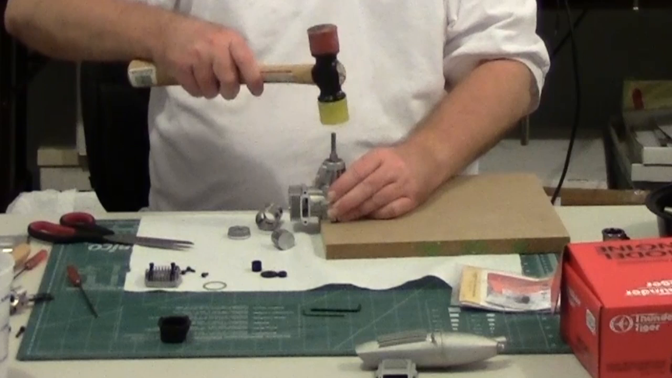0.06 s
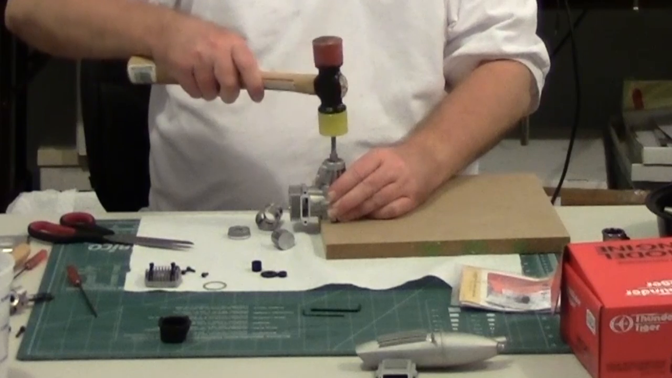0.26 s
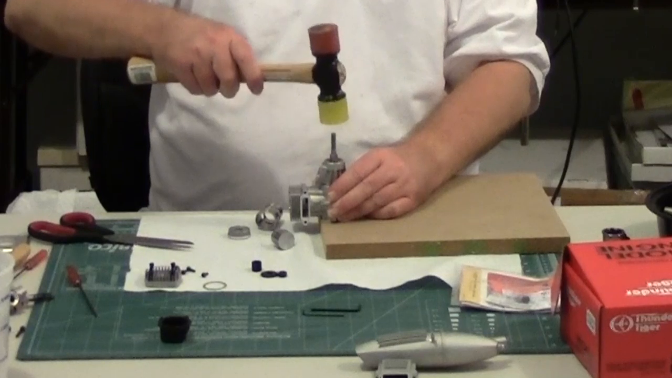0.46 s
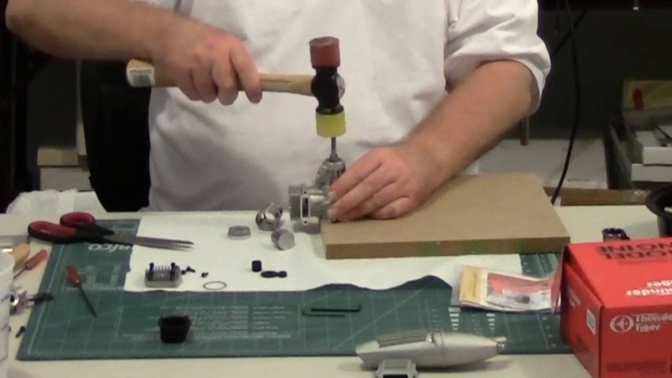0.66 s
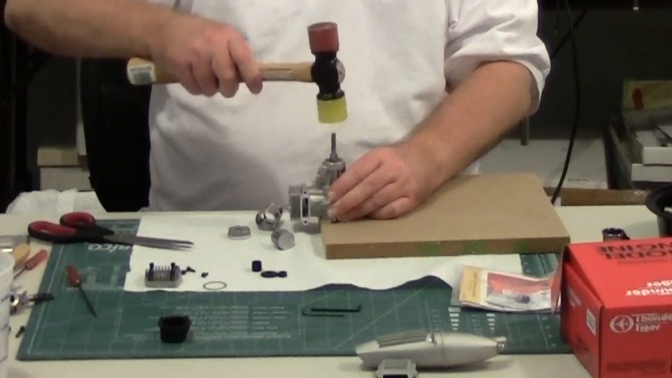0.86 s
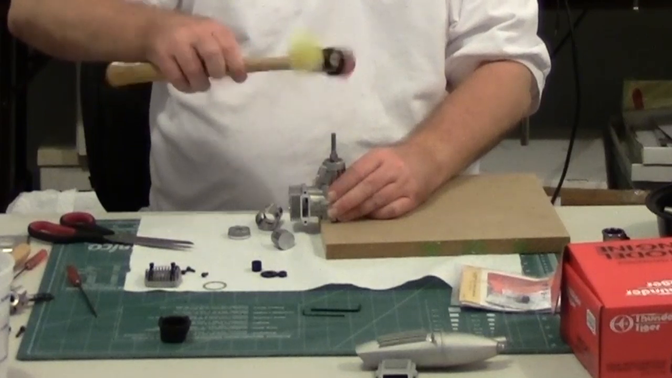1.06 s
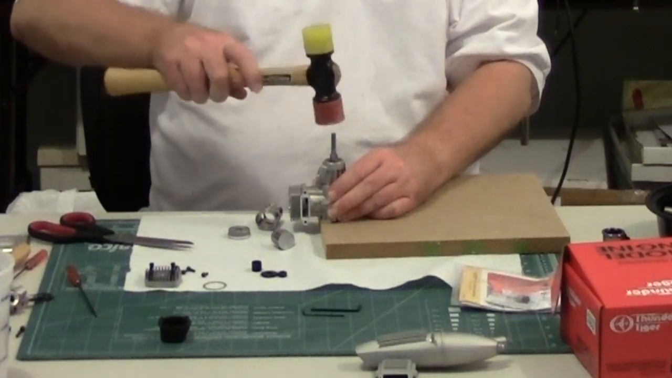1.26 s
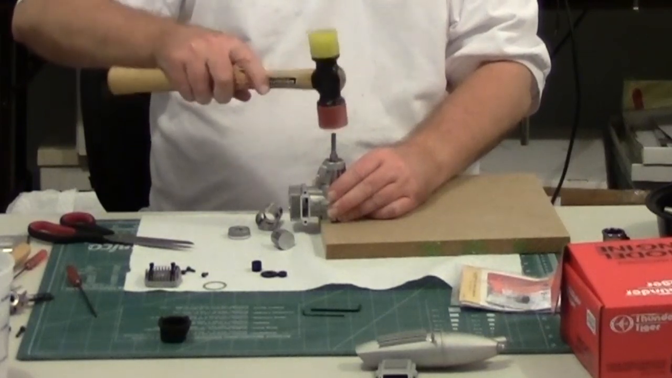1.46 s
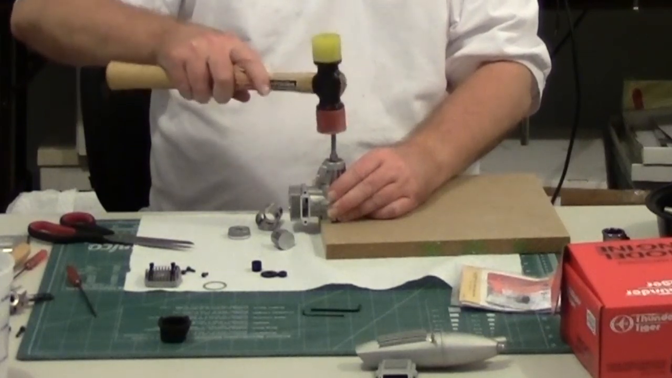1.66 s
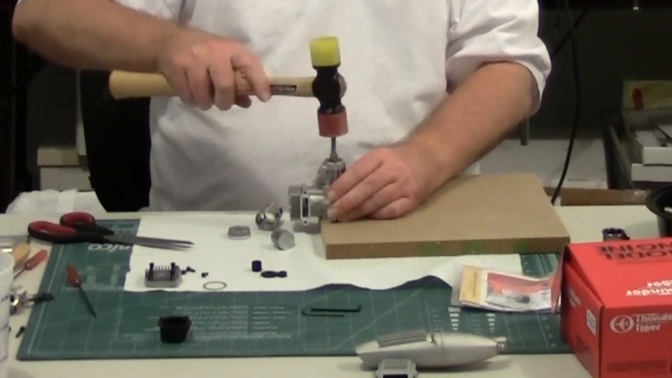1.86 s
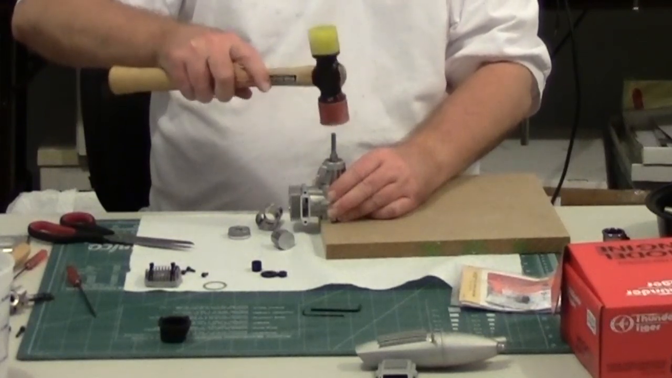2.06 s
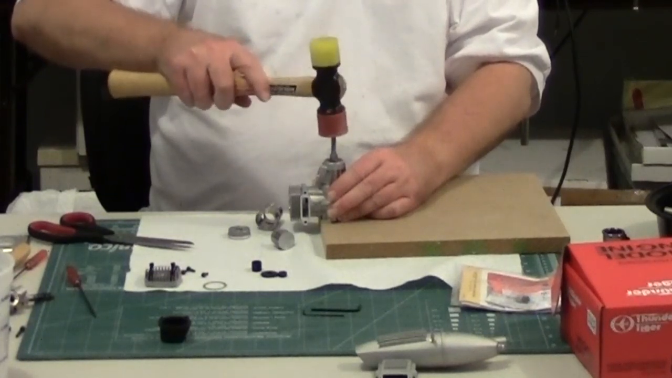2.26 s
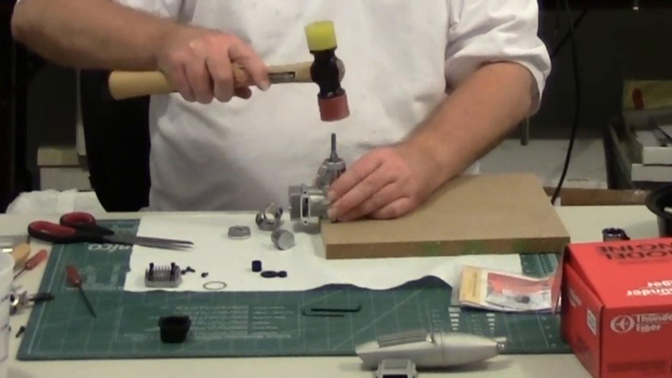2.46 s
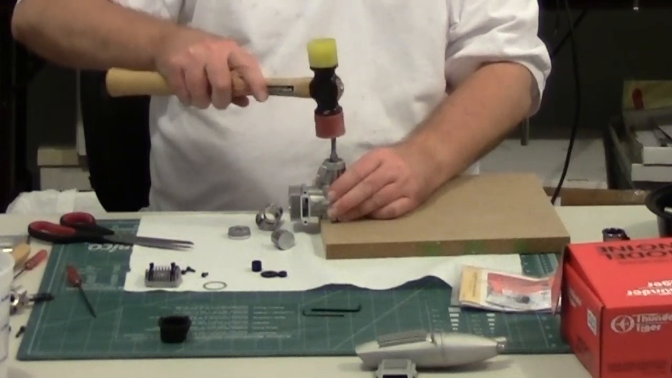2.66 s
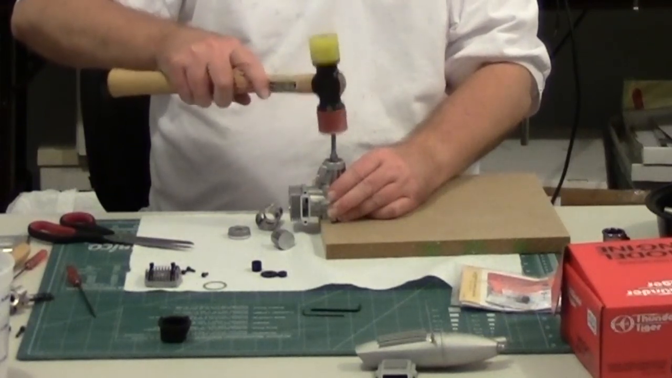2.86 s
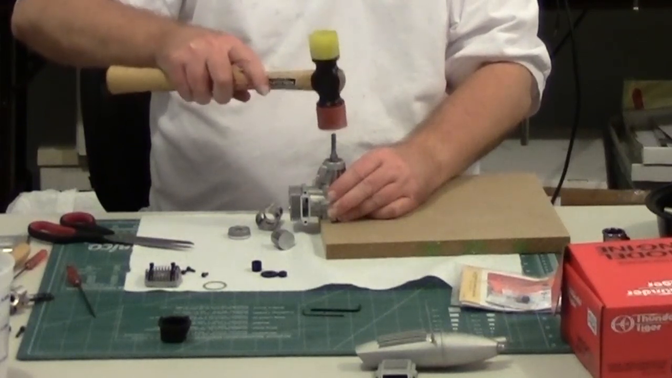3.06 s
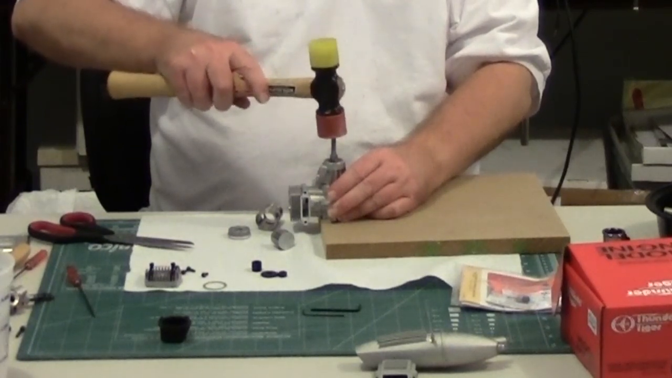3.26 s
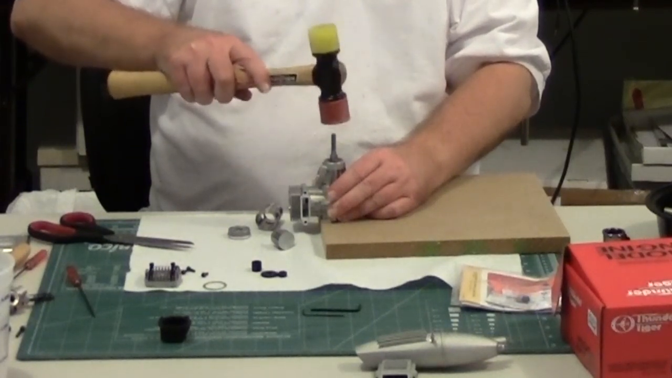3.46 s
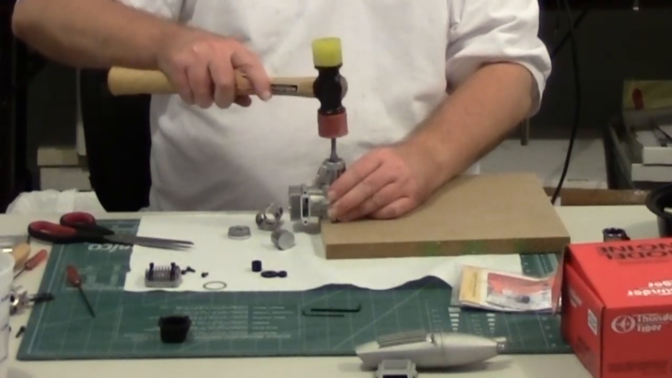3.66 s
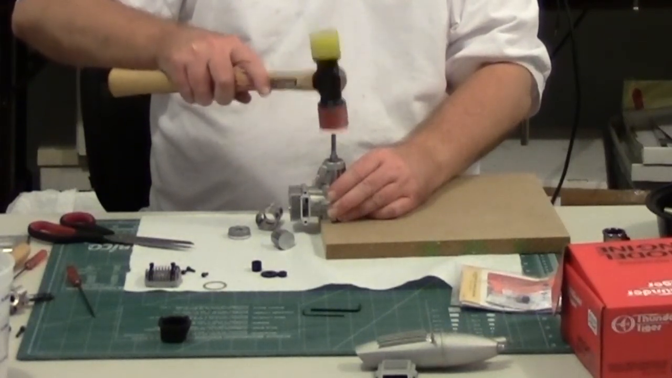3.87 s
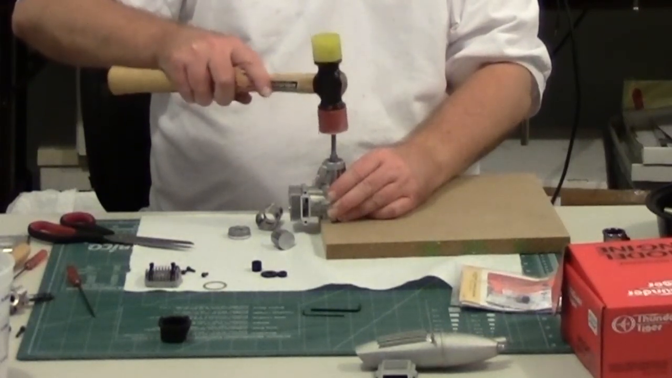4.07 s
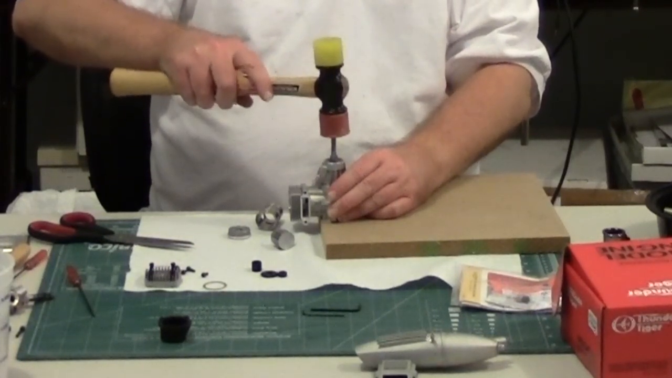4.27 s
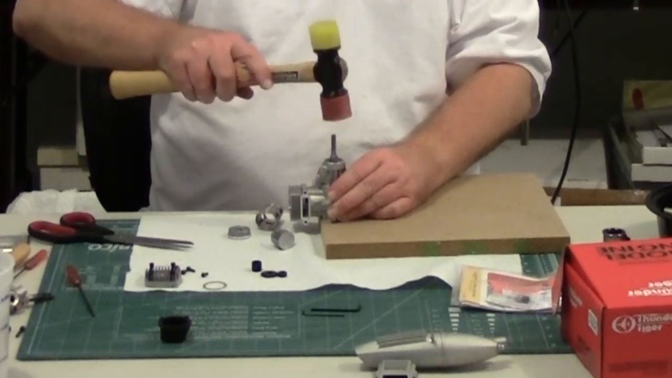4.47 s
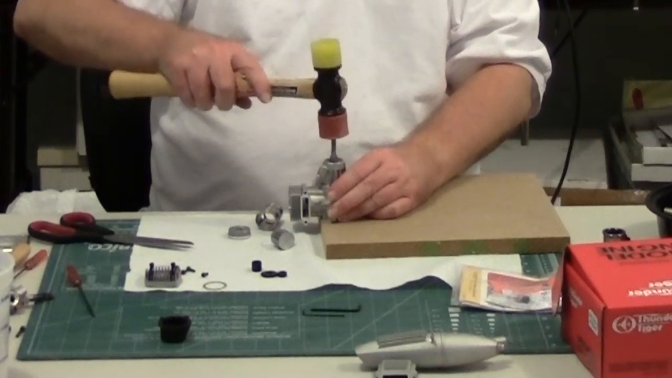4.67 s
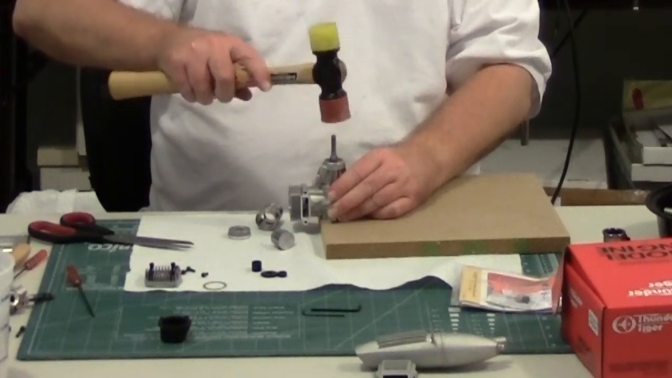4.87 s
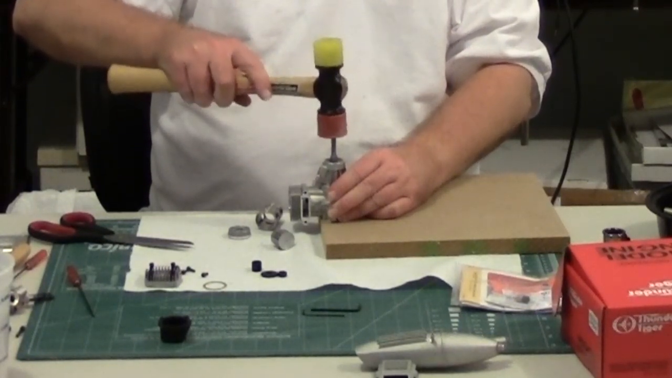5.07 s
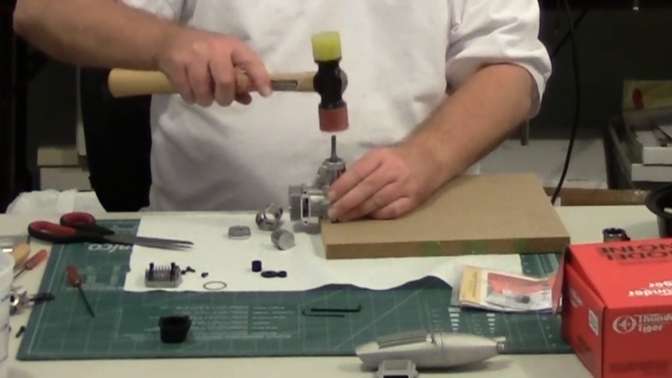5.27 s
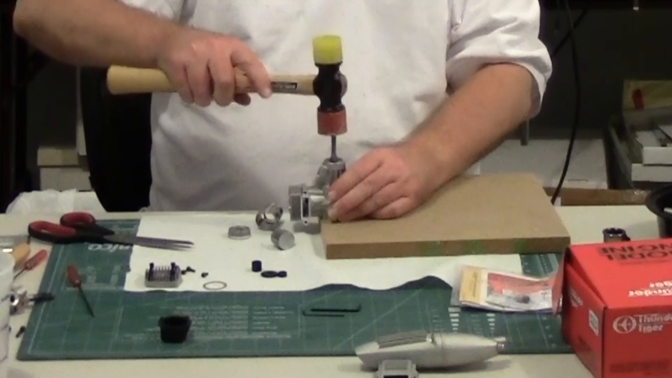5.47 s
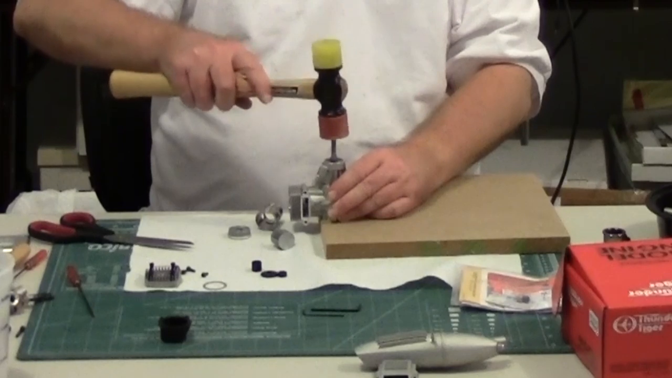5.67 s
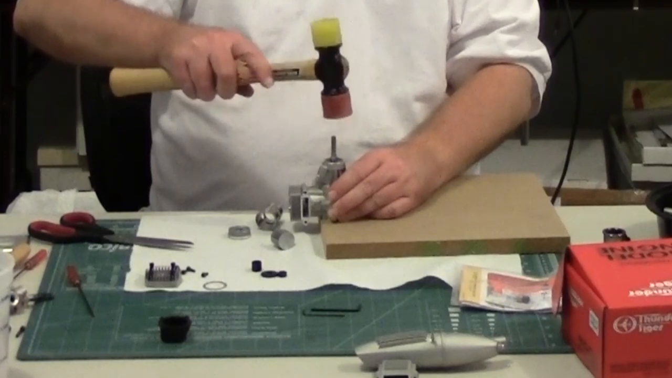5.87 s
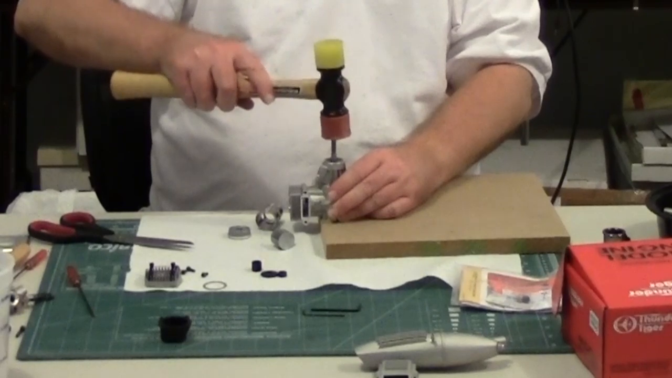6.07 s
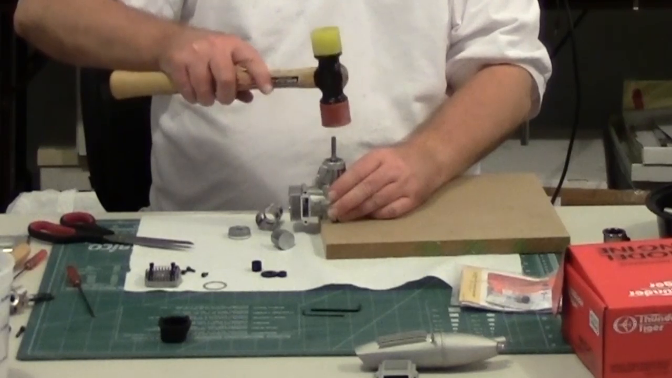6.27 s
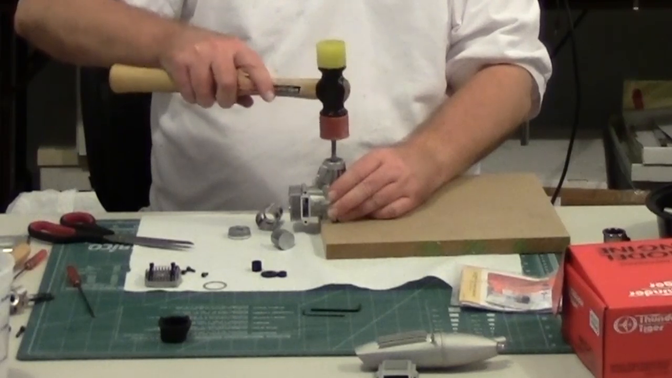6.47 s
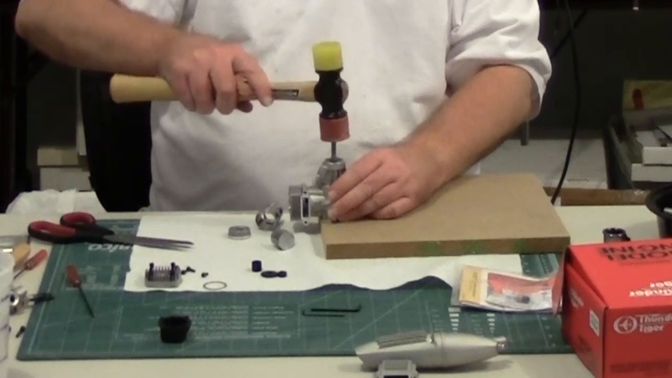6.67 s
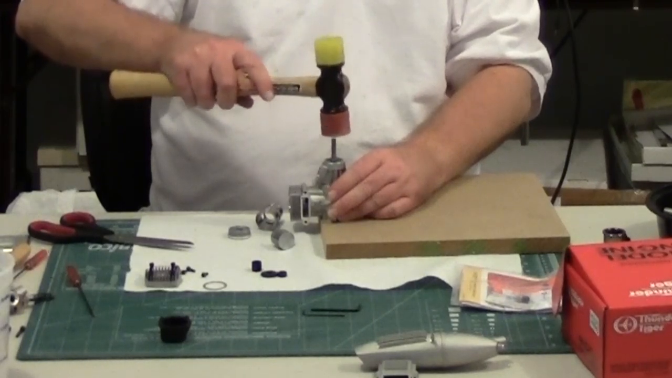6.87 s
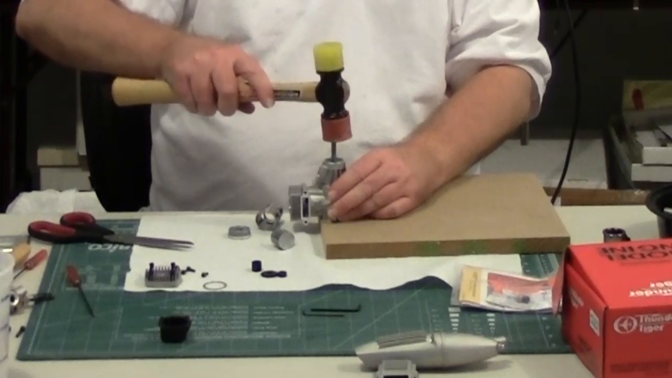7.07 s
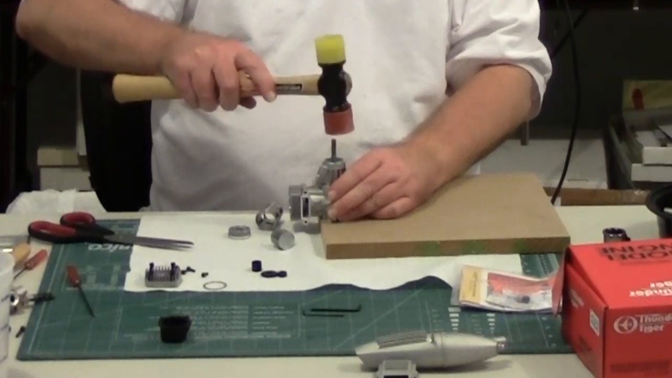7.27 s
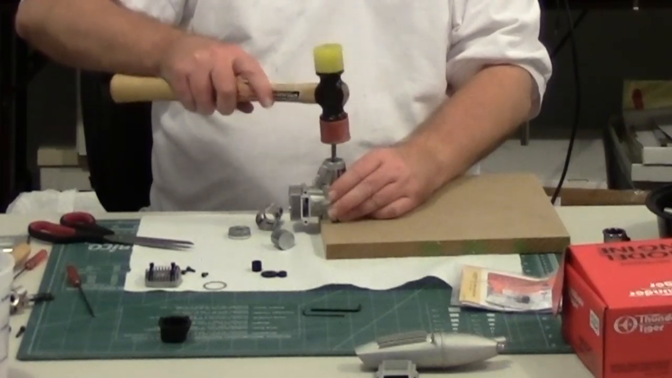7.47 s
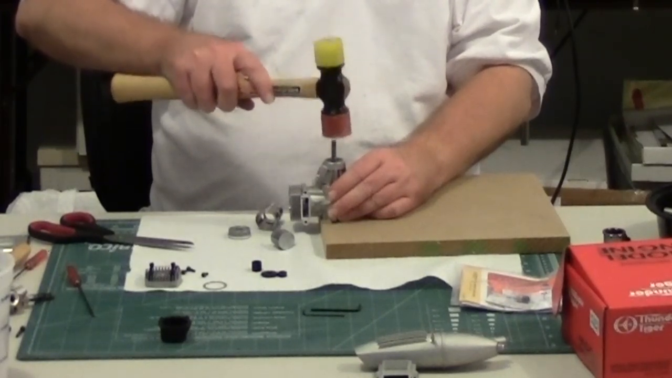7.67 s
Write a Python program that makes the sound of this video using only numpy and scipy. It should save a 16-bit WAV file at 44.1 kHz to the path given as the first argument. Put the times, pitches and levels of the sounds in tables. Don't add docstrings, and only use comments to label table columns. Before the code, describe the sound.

In a workshop, a plastic-faced mallet taps a steel shaft in a small metal housing resting on a board on a bench. The tail of a blow opens the sound, then harder, brighter knocks fall at 0.3 and 0.65 seconds. Their short room echo dies into near-silence, with barely audible low swells around 1.4 to 1.5. From 1.64 a softer, duller face strikes steadily, roughly every 0.35 seconds. Each tap is a compact woody thud with low bench resonance, a slight metallic knock and a tight rattle about ten milliseconds later as the housing lands. Small loose parts clink faintly, with a clearer high ring near 2.7 and another near 6.8. From about 6.5 the taps weaken, the last at 7.5 very soft. Faint workshop hush surrounds each blow, then is gated away.

```python
import sys
import numpy as np
from scipy import signal
from scipy.fft import rfft, irfft
from scipy.io import wavfile
from scipy.ndimage import uniform_filter1d

SR = 44100
rng = np.random.default_rng(int(sys.argv[2]) if len(sys.argv) > 2 else 0)


def dump(signal):
    limited = np.clip(np.atleast_2d(signal).T, -1, 1)
    pcm = np.round(limited * 32767).astype(np.int16)
    wavfile.write(sys.argv[1], SR, pcm)


def level_to_linear(level):
    exponent = np.asarray(level, float) / 20
    return 10 ** exponent


N = 339966
LENGTH = 32000

# f/Hz, level/dB, t60/s
PARTS = [(4400, -3, .18), (5420, -8, .2), (6100, -1, .15), (6670, -1, .1), (7560, -14, .08),
         (8800, -1, .14), (10320, -17, .22), (10700, -6, .11), (13100, -24, .12), (14300, -24, .1)]
# f/Hz, density/(dB per Hz)
RATTLE_COLOUR = [(1760, -10.5), (3000, -6.5), (3500, -3.5), (5030, -11.5), (8870, -16), (9520, -19.5),
                 (12900, -23), (16000, -51.5)]
# t/s, level/dB
HUSH_FADE = [(5.8, -2.5), (6.5, -4), (7.101, -9), (7.45, -10.5), (7.7, -12.5)]


def evened(x):
    return x / np.sqrt(np.mean(x ** 2) + 1e-20)


def read(points, hz, axis=1):
    table = np.transpose(points)
    return np.interp(np.log(hz + 1), np.log(table[0] + 1), table[axis])


def add(mix, s, sound):
    at = round(s * SR)
    sound = sound[..., max(-at, 0):]
    part = mix[..., max(at, 0):][..., :sound.shape[-1]]
    part += sound[..., :part.shape[-1]]


def onset(rise_s):
    return 1 - np.exp(-(np.arange(LENGTH) / SR / rise_s) ** 2)


def modes(rows, detune):
    t = np.arange(LENGTH) / SR
    out = 0
    for (hz, db, t60_s), ratio in zip(rows, detune):
        out = out + level_to_linear(db - 60 * t / t60_s) * np.sin(2 * np.pi * hz * ratio * t)
    return out


def scattered(rows, scatter_db, chance):
    return [(hz, db + scatter_db * c, t60_s) for (hz, db, t60_s), c in zip(rows, chance)]


def field(white, colour, rise_s, hold_s, ring=1, lumps_db=0, wide_db=-3):
    # f/Hz, t60/s
    near_t60 = [(60, 0.37), (200, 0.29), (600, 0.4), (2000, 0.31), (5000, 0.26), (12000, 0.17)]
    # f/Hz, t60/s, level under near field/dB
    far_end = [(60, 0.82, -18), (200, 0.37, -28.5), (597, 0.5, -19), (2000, 0.58, -16.5), (5000, 1, -20),
               (12000, 1, -18.5)]
    # f/Hz, side minus mid/dB
    side_db = [(60, -9), (150, -20), (380, -25), (950, -23), (1900, -30.5), (2800, -36.5), (8000, -39),
               (12000, -17.5)]
    fill_cycles = 1.5
    hz, t, z = signal.stft(white, SR, nperseg=512, noverlap=384)
    build = 1 - np.exp(-(t + 0.0015) * hz[:, None] / fill_cycles)
    t = np.maximum(t - hold_s, 0) / ring
    near = level_to_linear(-60 * t / read(near_t60, hz)[:, None])
    far = level_to_linear(read(far_end, hz, axis=2)[:, None] - 60 * t / read(far_end, hz)[:, None])
    tone = level_to_linear(read(colour, hz))
    tone = tone / np.sqrt(np.mean(tone ** 2)) * level_to_linear(lumps_db)
    z *= tone[:, None] * np.hypot(near, far) * build
    z[1] *= level_to_linear(read(side_db, hz) + wide_db)[:, None]
    echoes = signal.istft(z, SR, nperseg=512, noverlap=384)[1]
    return echoes[:, :LENGTH] * onset(rise_s)


def hush():
    # f/Hz, density/(dB per Hz)
    colour_db = [(15, -47), (25, -5), (157, -4), (317, -8.5), (886, -12.5), (1130, -19), (1370, -19),
                 (1790, -20), (6910, -39), (11200, -44), (16000, -60.5)]
    # f/Hz, side minus mid/dB
    side_db = [(100, -9), (1500, -13.5), (5000, -19), (12000, -4)]
    hz = np.fft.rfftfreq(N, 1 / SR)
    colour = level_to_linear(read(colour_db, hz) + np.array([0 * hz, read(side_db, hz)]))
    level_db = -42.5 + np.interp(np.arange(N) / SR, *np.transpose(HUSH_FADE))
    noise = irfft(rfft(rng.standard_normal((2, N))) * colour, N)
    return level_to_linear(level_db) * evened(noise) * np.sqrt(2)


def knock(hard, chance):
    # f/Hz, level/dB, t60/s
    shaft = [(648, 5.5, 0.0067), (1189, -2.5, 0.08), (1453, -40, 0.019), (1950, -3, 0.0084),
             (2390, -16, 0.033), (2540, -1.5, .04), (3410, -6, 0.018), (4330, -13, 0.03), (4610, -22, 0.01)]
    # f/Hz, level/dB, t60/s
    housing = [(1220, -29.5, 0.63), (1453, -46.5, 0.52), (2750, -39.5, 0.76), (3590, -37.5, 0.66)]
    shaft_rows = scattered(shaft, 2.5, chance[2:])
    strike = level_to_linear(-7.5 + 6 * hard) * modes(shaft_rows, 1 + .015 * chance[::-1])
    return (strike + modes(housing, 1 + 0.0037 * chance)) * onset(.0004)


def thud(soft_db, bench_db, shop, fresh, chance):
    # f/Hz, density/(dB per Hz)
    colour = [(15, -59), (25, -57.5), (149, -2), (326, -4.5), (439, -2), (545, -8), (607, -7), (839, -6.5),
              (961, -5.5), (1070, -6), (1740, -8.5), (4130, -20.5), (13600, -55.5), (16000, -48)]
    # f/Hz, level/dB, t60/s
    board = [(253, -9.5, 0.5), (365, -6, .18), (438.8, 4, 0.22), (494, -8, 0.43), (681.4, -3.5, 0.32),
             (883, -9.5, 0.23)]
    # f/Hz, level/dB, t60/s
    legs = [(79.6, -21.5, 0.28), (135.9, -13.5, 0.27), (244, -14, 0.25)]
    board_db = -5.5 - 1.5 * chance[-1] + 0.22 * soft_db
    t = np.arange(LENGTH) / SR
    alike = np.clip(1.32 * np.exp(-t / 0.021), 0, 1)
    white = alike * shop + np.sqrt(1 - alike ** 2) * fresh[0]
    lumps_db = 1.5 * evened(uniform_filter1d(fresh[1, 1, -257:], size=3))
    out = field(white, colour, .0004, 0.025, lumps_db=lumps_db) * level_to_linear(-9)
    board_rows = scattered(board, 2.5, chance[4:])
    out[0] += level_to_linear(board_db - 7.5) * modes(board_rows, 1 + .015 * chance) * onset(0.0025)
    legs_db = 0.44 * (bench_db + 20.5)
    out[0] += level_to_linear(legs_db) * modes(legs, 1 + 0.026 * chance) * onset(0.035)
    return out


def rattle(soft_db, hard, fresh, chance):
    level_db = -20.5 - 7.8 * soft_db - 2 * hard
    lumps_db = 2.5 * evened(uniform_filter1d(fresh[1, 0, -257:], size=7))
    out = field(fresh[1], RATTLE_COLOUR, 0.0037, 0.016, ring=1.22, lumps_db=lumps_db, wide_db=-9) * level_to_linear(level_db)
    damped = [(hz, db, t60_s / 2) for hz, db, t60_s in scattered(PARTS, 5, chance[::-1])]
    out[0] += level_to_linear(level_db - 12) * modes(damped, 1 + .02 * chance) * onset(.001)
    return out


def bench_hum(bench_db):
    # f/Hz, level/dB, t60/s, build-up/s
    bench = (167, 4, 0.48, 0.013)
    hz, hum_db, t60_s, build_s = bench
    t = np.arange(LENGTH) / SR
    return level_to_linear(bench_db + hum_db - 60 * t / t60_s) * onset(build_s) * np.sin(2 * np.pi * hz * t)


def blow(row, shop, fresh, chance):
    # f/Hz, level/dB
    echo_colour = [(300, -21.5), (800, 0), (1200, -1), (2500, -2.5), (4300, -21), (6000, -26.5),
                   (16000, -57)]
    # delay/s, level/dB
    wall = (.024, -8)
    s, db, bench_db, jump_ms = row
    hard = s < 1.1
    soft_db = max(-10 - db, 0)
    landing_db = -8.5 + 1.85 * (jump_ms - 13.2)
    body = thud(soft_db, bench_db, shop, fresh, chance)
    metal = rattle(soft_db, hard, fresh, chance)
    out = body + level_to_linear(-20) * metal
    out[0] += knock(hard, chance)
    add(out, jump_ms / 1000, level_to_linear(landing_db) * body + metal)
    add(out, wall[0], level_to_linear(wall[1] - 10) * field(fresh[1, :, ::-1], echo_colour, 0.0025, 0.013))
    out[0] += bench_hum(bench_db)
    return level_to_linear(db) * out


def clink(row, fresh, chance):
    s, db, centre_hz, spread = row
    rows = [(hz, level - 6 * (np.log2(hz / centre_hz) / spread) ** 2, t60_s) for hz, level, t60_s in PARTS]
    out = level_to_linear(1) * spread * field(fresh, RATTLE_COLOUR, 0.0039, 0.0036)
    waver = 1 + 1.5 * evened(uniform_filter1d(fresh[0], 150))
    out[0] += level_to_linear(-8) * modes(rows, 1 + 0.0028 * chance) * onset(0.002) * waver
    return level_to_linear(db) * out


def rumble():
    # t/s, f/Hz, half length/s, level/dB
    swells = [
        (1.399, 205, 0.023, -75),
        (1.47, 135.2, .03, -64),
        (1.503, 145, .04, -72),
    ]
    t = np.arange(N) / SR
    out = np.zeros(N)
    for s, hz, half_s, db in swells:
        out += level_to_linear(db) * np.exp(-((t - s) / half_s) ** 2) * np.sin(2 * np.pi * hz * t)
    return out


def scene():
    blows = [(-.05, -6.5, -19, 9.9), (0.2804, -5, -20.5, 8), (0.656, -6.5, -18, 7), (1.639, -8.5, -16, 14),
             (1.986, -6, -16.5, 14.5), (2.342, -6.5, -15, 11), (2.685, -5.5, -15, 8.8),
             (3.021, -6.5, -14.5, 9.5), (3.349, -6, -13, 10), (3.683, -7, -15, 9.5),
             (4.031, -5.5, -14.5, 9), (4.37, -6, -16.5, 9.2), (4.722, -6, -13, 7.5), (5.078, -6, -12, 7.4),
             (5.437, -8, -16.5, 8.5), (5.763, -7, -15.5, 11), (6.123, -7, -20, 8.5),
             (6.466, -10.5, -43, 8.5), (6.805, -13.5, -34, 8), (7.156, -19.5, -50, 6.6),
             (7.478, -28, -32, 4.6)]
    # t/s, level/dB, ring centre f/Hz, spread/octaves
    clinks = [
        (0.839, -45.5, 7630, 0.92),
        (2.075, -51, 14300, .1),
        (2.17, -39, 7700, 0.49),
        (2.691, -24, 8950, 0.057),
        (2.865, -46, 7300, 0.79),
        (3.185, -48, 8060, 0.62),
        (3.851, -45.5, 6500, 0.59),
        (5.92, -42.5, 8000, 0.77),
        (6.819, -32, 10200, 0.027),
        (7.482, -43, 5420, .04),
    ]
    mix = hush()
    shop = rng.standard_normal((2, LENGTH))
    for row in blows:
        add(mix, row[0], blow(row, shop, rng.standard_normal((2, 2, LENGTH)), rng.standard_normal(12)))
    for row in clinks:
        add(mix, row[0], clink(row, rng.standard_normal((2, LENGTH)), rng.standard_normal(12)))
    mid, side = mix
    return np.array([mid + side, mid - side]) * level_to_linear(-2.17)


def gate(x):
    # start/s, end/s
    print_s = (1.25, 1.6)
    # f/Hz, level/dB
    margin = [(50, 13), (400, 10.5), (560, 18.5), (700, 14), (860, 17.5), (1150, 9.5), (3500, 21),
              (10000, 15.5)]
    # f/Hz, share/(dB per dB)
    follows = [(60, 1.5), (400, 1.36), (560, 0.63), (16000, 0.55)]
    # f/Hz, time/s
    shut_s = [(60, 0.59), (200, .4), (370, 0.55), (780, 0.44), (1300, 0.57), (3000, 0.59), (6000, 0.46),
              (12000, 0.34)]
    # f/Hz, left minus right/dB
    lean_db = [(60, 1.6), (240, .4), (700, 0), (16000, 0)]
    open_s, top_hz, lump_db = 0.021, 15800, 0.5
    hz, t, z = signal.stft(x, SR, nperseg=2048, noverlap=1536)
    power_db = 10 * np.log10(uniform_filter1d((abs(z) ** 2).mean(0), size=5, axis=0) + 1e-20)
    print_db = np.median(power_db[:, (t > print_s[0]) & (t < print_s[1])], axis=1)
    lumps = evened(uniform_filter1d(rng.standard_normal(len(hz)), size=5))
    threshold_db = print_db + np.maximum(read(margin, hz) + lump_db * lumps, 10.5)
    fade_db = np.interp(t, *np.transpose(HUSH_FADE))
    over_db = power_db - threshold_db[:, None] - read(follows, hz)[:, None] * fade_db
    opening = np.clip(1 + over_db / 3, 0, 1)
    opening[:, 0] = 1
    closing = t / (read(shut_s, hz) * np.exp(-.12 * lumps))[:, None]
    opening = np.maximum.accumulate(opening + closing, axis=1) - closing
    opening = np.maximum.accumulate((opening - t / open_s)[:, ::-1], axis=1)[:, ::-1] + t / open_s
    gain = uniform_filter1d(np.clip(opening, 0, 1) ** 1.89, size=3, axis=0) + level_to_linear(-49.5)
    gain *= (hz < top_hz)[:, None]
    lean = level_to_linear(np.outer([.5, -.5], read(lean_db, hz)))[..., None]
    return signal.istft(z * gain * lean, SR, nperseg=2048, noverlap=1536)[1][:, :N]


def low_pass(x):
    return signal.sosfilt(signal.butter(12, 16120, fs=SR, output="sos"), x)


def record(dry):
    limit = level_to_linear(-2)
    low_cut = signal.lfilter(*signal.butter(2, 55, "high", fs=SR), dry)
    limited = limit * np.tanh(low_cut / limit)
    return low_pass(gate(limited) + rumble())


dry = scene()
out = record(dry)
dump(out)
```